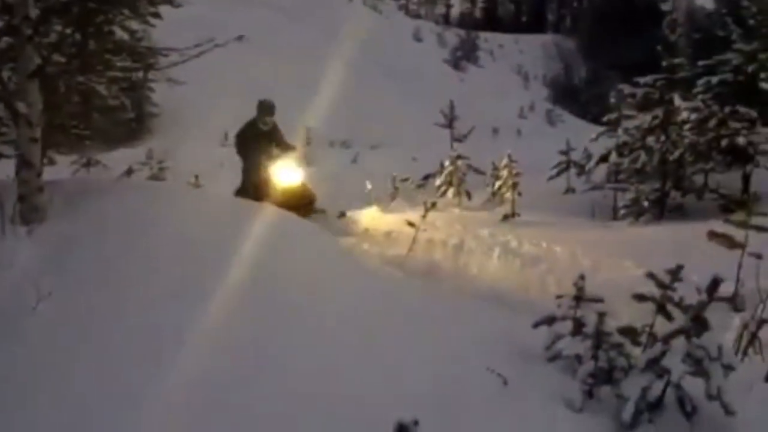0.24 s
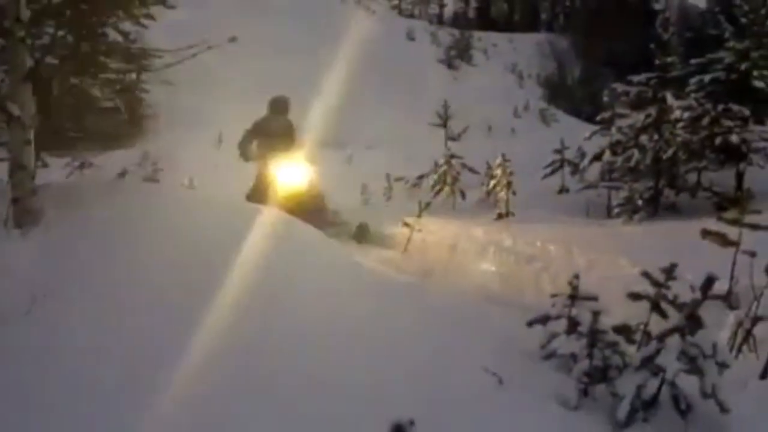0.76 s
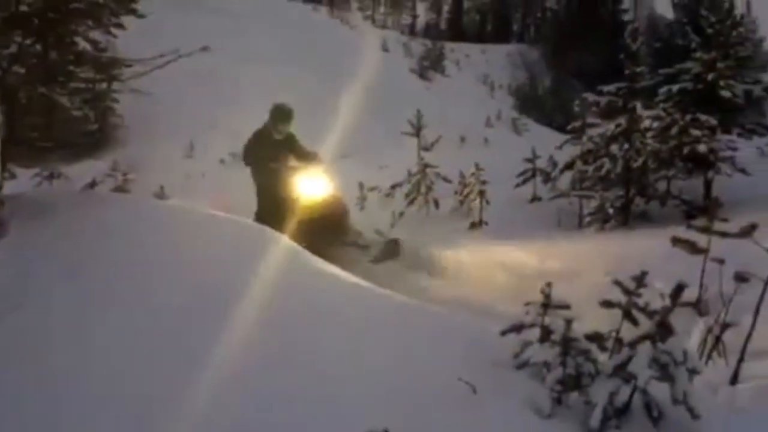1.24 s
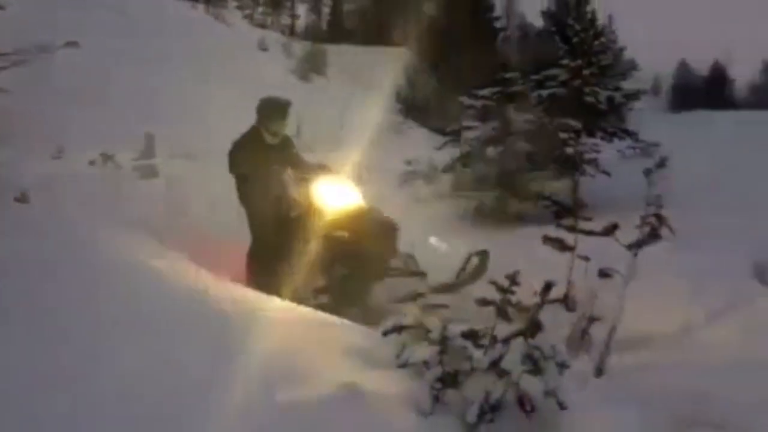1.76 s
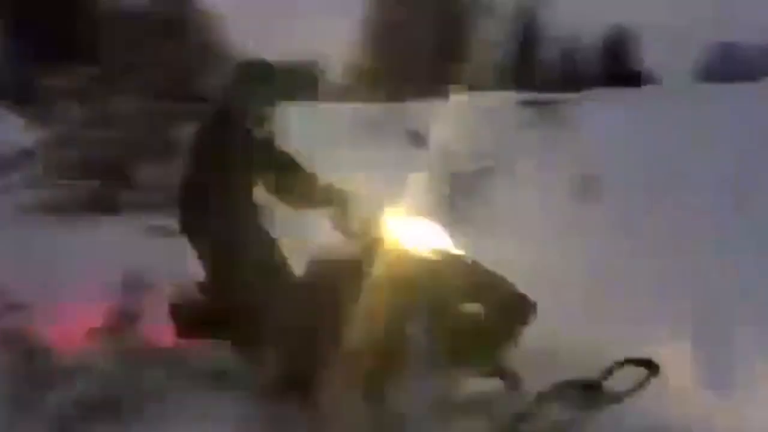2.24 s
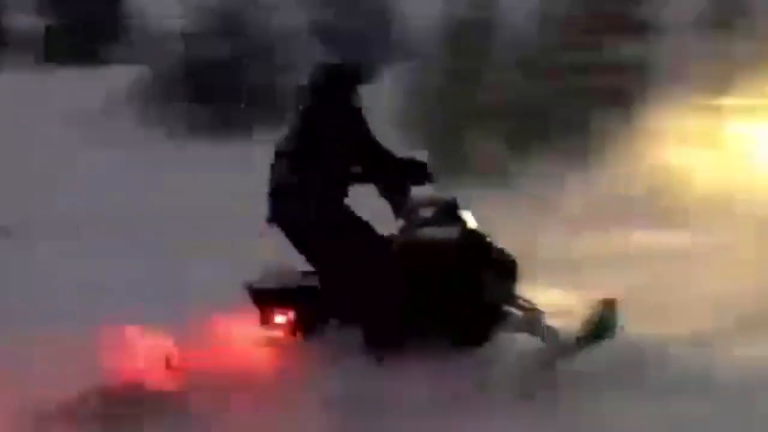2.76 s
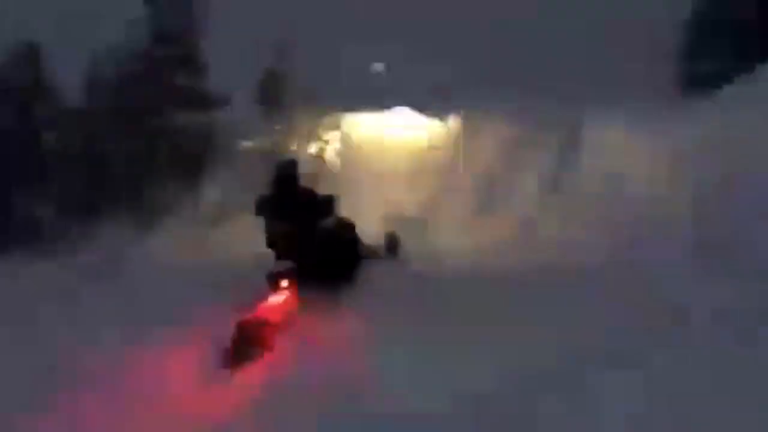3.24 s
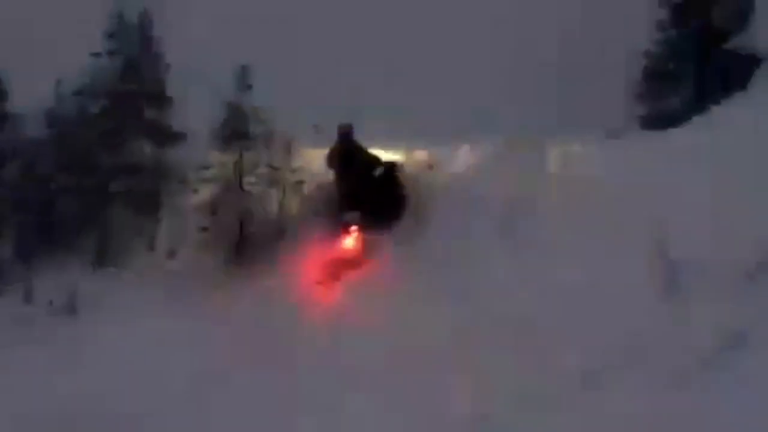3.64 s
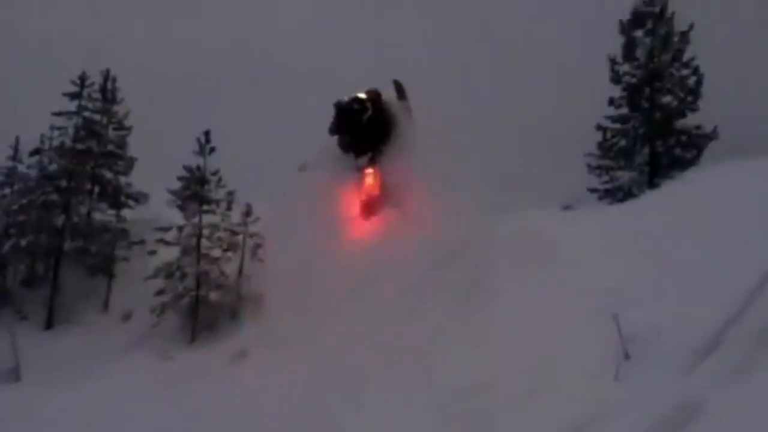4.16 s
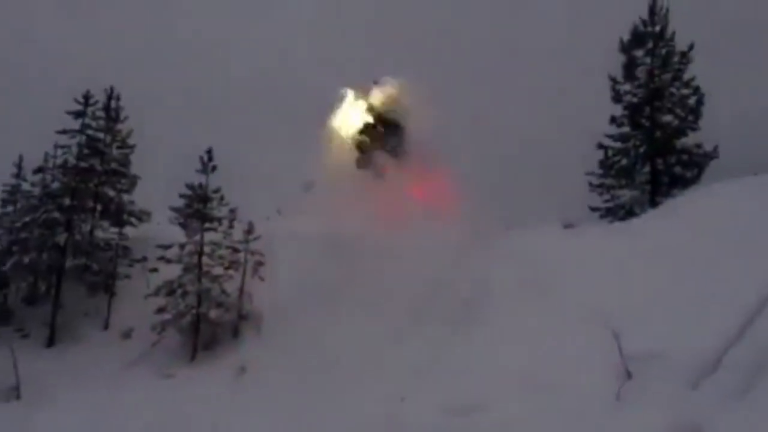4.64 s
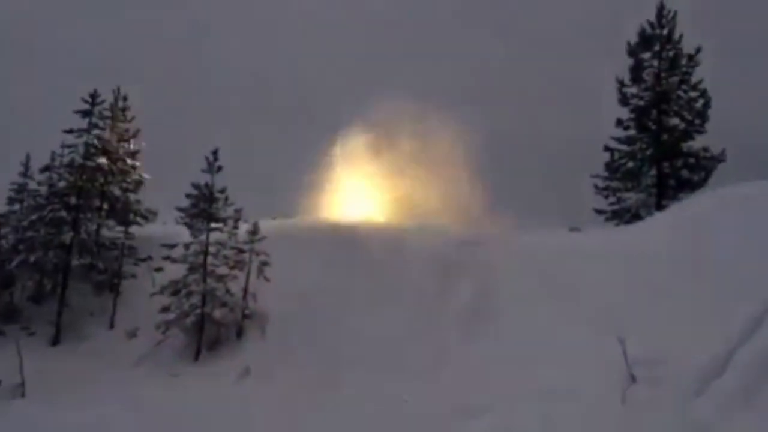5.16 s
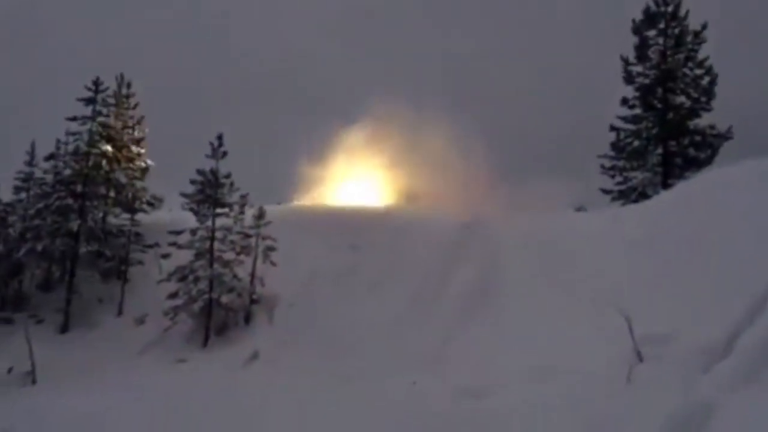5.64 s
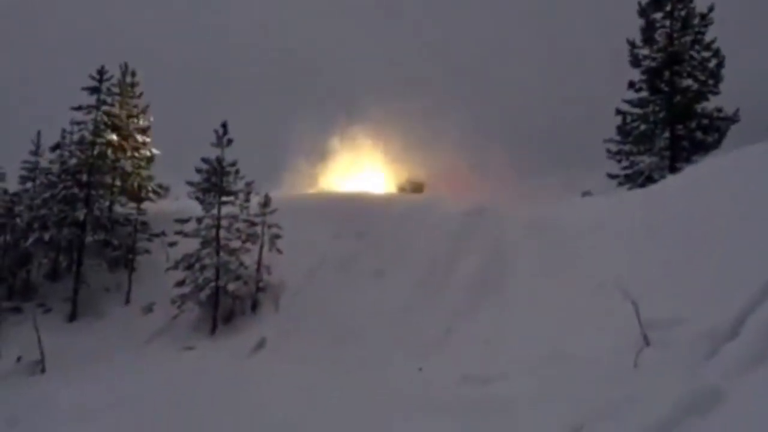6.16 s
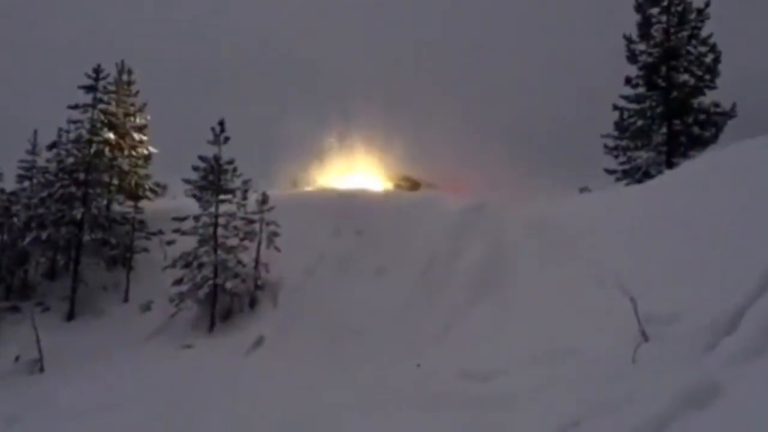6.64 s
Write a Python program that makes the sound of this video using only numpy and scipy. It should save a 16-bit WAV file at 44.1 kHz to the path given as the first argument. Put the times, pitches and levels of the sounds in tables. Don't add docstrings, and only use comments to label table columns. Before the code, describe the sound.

Raspy snowmobile engine swells from a low idle, rushes past with a windy thump, surges uphill, breaks into misfires and dies away.

```python
import sys
import numpy as np
from scipy import signal
from scipy.io import wavfile
from scipy.ndimage import uniform_filter1d

SR = 44100
rng = np.random.default_rng(int(sys.argv[2]) if len(sys.argv) > 2 else 0)


def bounce(signal):
    frames = np.transpose(np.atleast_2d(signal))
    limited = np.clip(frames, -1, 1)
    pcm = np.round(limited * 32767).astype(np.int16)
    wavfile.write(sys.argv[1], SR, pcm)


def voltage_ratio(decibels):
    exponent = np.asarray(decibels, float) / 20
    return 10 ** exponent


N = 304290
STEP = 40
CLOCK = np.arange(0, N + STEP, STEP) / SR
TOP_HZ = 8640
PASS_S, BANK_S, MISFIRE_S, COAST_S = 1.6, 3.2, 5.77, 6.32

# (time [s], rev change [Hz], bark change [dB], length [s])
GRIP = [
    (1.229, 10, 1, .1),
    (2.669, 15, -1, .135),
    (2.765, -7.5, 3.5, 0.055),
    (3.464, -23.5, -6, .116),
    (3.67, 4, -7, 0.0322),
    (5.374, -9, 3, .111),
    (5.428, 0.44, -7.5, .06),
]
# (time [s], bark [dB], brightness [dB])
THROTTLE = [(0, -47, 0.5), (.9, -42.5, -3.5), (1.19, -28.5, -2), (1.75, -26, 12), (2.12, -28.5, 4.5),
            (2.27, -35, -11), (2.55, -25, 1), (3.05, -25.5, -0.5), (3.22, -38.5, 8), (3.4, -37.5, -18.5),
            (4.15, -30, 5.5), (4.43, -37.5, -8), (4.75, -25.5, 0.5), (5.75, -26, 0.5), (5.84, -38.5, 4),
            (6.2, -31, -6.5), (6.25, -43, 0), (6.9, -45, -3.5)]


def engine():
    hz = revs()
    levels = orders(hz)
    uneven, hiss = burn()[:2]
    fits = voltage_ratio(4 * np.clip(drift(7), -2, 2))
    uneven = uneven * fits ** (1 - after(MISFIRE_S))
    hiss = np.minimum(hiss * fits ** .7, .8)
    turns = 2 * np.pi * np.cumsum(fine(hz)) / SR + fine(.03 * drift(20))
    cycle = np.floor(turns / (2 * np.pi) + 0.12).astype(int) + 2
    chance = rng.standard_normal(2400)[cycle]
    mismatch = .05 * (1 + 0.85 * nose_on())
    strength = 1 + fine(uneven) * chance + fine(mismatch) * (-1.) ** cycle
    strength = uniform_filter1d(strength, size=24)
    lift_db = catching()
    tones = bark(hz, turns, hiss) * strength + pipe(turns, strength, levels)
    breath = (1 + strength) / 2 * jet(turns, hiss)
    return fine(voltage_ratio(lift_db)) * tones + fine(voltage_ratio(0.45 * lift_db)) * breath


def revs():
    # (time [s], firing rate [Hz])
    speed = [(0, 187.3), (.23, 197.3), (.88, 199.7), (1.3, 266.2), (1.71, 287.1), (2.06, 280.7),
             (2.29, 221.9), (2.64, 245.7), (2.95, 264.3), (3.22, 230.9), (3.84, 243.8), (4.09, 274.7),
             (4.43, 231.5), (4.69, 261.7), (5.02, 283.4), (5.75, 281.9), (5.9, 249.4), (6.9, 191.5)]
    bend = sum(hz * swell(s, length) for s, hz, _, length in GRIP)
    return uniform_filter1d(in_time(speed)[0], size=60) + bend


def load():
    return in_time(THROTTLE)[0] + sum(db * swell(s, length) for s, _, db, length in GRIP)


def burn():
    idle_hz, clear_hz, lag_s = 195, 250, .02
    hz = revs()
    dirty = np.clip((clear_hz - np.interp(CLOCK - lag_s, CLOCK, hz)) / (clear_hz - idle_hz), 0, 1)
    shutting = np.clip(-np.gradient(hz, CLOCK) / 250, 0, 1) ** 2
    misfire, coast, nose = after(MISFIRE_S), after(COAST_S), nose_on()
    uneven = np.maximum(.062 + .13 * dirty + .04 * nose + .12 * shutting, .14 * misfire)
    hiss = .02 + .4 * dirty ** 1.3 + .1 * nose + .18 * shutting
    hiss = hiss * (1 - misfire) + .1 * misfire + .55 * coast
    rasp_db = 1.2 * dirty + nose * (3.8 + 3.5 * dirty)
    rasp_db = rasp_db * (1 - misfire) - 5.4 * misfire + 10.0 * coast
    boom_db = 9.3 * misfire - 5.5 * coast
    return uneven, hiss, rasp_db, boom_db


def catching():
    # (time [s], lift [dB], length [s])
    catches = [(3.307, -11.5, 0.026), (5.773, 8.5, 0.015), (5.799, 12.5, 0.014), (5.832, 13.5, 0.015),
               (5.87, 14.5, 0.019), (5.906, 10, 0.028), (5.953, -1, .012), (5.964, 8, 0.019),
               (5.994, 13, 0.04), (6.037, 11.5, .014), (6.053, 5.5, .016), (6.104, 4, 0.0086),
               (6.131, 11, 0.022), (6.162, 15, 0.02), (6.195, 10.5, 0.026), (6.279, 11.5, 0.0093)]
    lift = sum(db * np.exp(-((CLOCK - s - length / 2) / (length * .5)) ** 6) for s, db, length in catches)
    return lift - 19.1 * uniform_filter1d(lift > 1, size=100, output=float)


def pipe(turns, strength, levels):
    # (order [-], level against the bark [dB])
    shaft = [(.5, -29.5), (1.5, -40.5), (2.5, -21), (3.5, -30.5), (4.5, -21.5)]
    soft = 1 + 0.68 * (uniform_filter1d(strength, size=200) - 1)
    whole = sum(fine(voltage_ratio(db)) * np.cos((k + 1) * (turns - .5 * k)) for k, db in enumerate(levels))
    load_db = uniform_filter1d(load(), size=200)
    half = 0
    for k, db in shaft:
        gain = voltage_ratio(load_db + db + 6.1 * drift(3.3))
        half = half + fine(gain) * np.cos(k * turns + fine(drift(1.4)))
    return np.sqrt(2) * soft * (whole + half)


def orders(hz):
    # (time [s], level [dB])
    note = [(0, -30.5), (.23, -26.5), (.8, -25.5), (1.15, -20.5), (1.4, -22.5), (1.72, -30), (2.0, -21.5),
            (2.29, -29.5), (2.4, -21.5), (2.63, -24.5), (2.8, -39.5), (3.25, -32), (3.6, -37), (4.2, -25.5),
            (5.0, -30), (5.8, -38), (6.17, -30), (6.9, -50.5)]
    # (order [-], level against the bark [dB], share of the note's swing [-])
    overtones = [(2, -8.5, 0.41), (3, -4.5, .2), (4, -1.5, 0.017)]
    note_db, = in_time(note)
    levels = [note_db]
    for k, db, share in overtones:
        swing_db = share * (note_db - load())
        levels.append(load() + db + swing_db + echo_db(k * hz) + 2.2 * drift(6))
    return levels


def bark(hz, turns, hiss):
    puffs, open_ground = 0, 1 - burn()[3] / 12
    for k in range(5, 38):
        flutter_db = min(.27 * k, 4.2) * drift(19)
        fade_db = 3.0 * open_ground * drift(3) + flutter_db
        gain = voltage_ratio(bark_db(k * hz) + fade_db) * np.sqrt(2 - 2 * hiss)
        shift = .25 * open_ground * drift(1.5) + .0012 * k * k * drift(25)
        spread = 0.0401 * k * k * open_ground
        puffs = puffs + fine(gain) * np.cos(k * (turns - .5) - fine(spread - shift))
    return puffs


def bark_db(hz, echo=1):
    regions_db = [-2.5, -6, -20.5, -29.5]
    brightens = [0, .2, 0.698, 1.1]
    # (frequency [Hz], level [dB])
    hood = [(1000, -1), (1250, 0), (1500, -2), (1850, 1), (2250, 0), (2700, 1), (3050, -3), (3900, 0),
            (4600, -2), (5200, -2), (7000, 0), (8000, -1), (8600, -4)]
    rasp_hz, boom_hz = 1878, 1180
    bright_db = in_time(THROTTLE)[1]
    place = np.interp(np.log(hz), np.log([1450, 2250, 3750, 6400]), [0, 1, 2, 3])
    tilt = 0
    for k in range(4):
        near = np.clip(1 - np.abs(place - k), 0, 1)
        tilt = tilt + (regions_db[k] + brightens[k] * bright_db) * near
    rasp_db, boom_db = burn()[2:]
    rings = rasp_db * np.exp(-((hz - rasp_hz) / 200.) ** 2)
    rings = rings + boom_db * np.exp(-((hz - boom_hz) / 250.) ** 2)
    rings = rings + boom_db * np.exp(-((hz - 2.25 * boom_hz) / 220.) ** 2)
    hood_hz, hood_db = np.transpose(hood)
    colour = np.interp(np.log(hz), np.log(hood_hz), hood_db)
    return load() + tilt + rings + echo * echo_db(hz) + colour


def echo_db(hz):
    # (time [s], frequency [Hz], lift [dB], length [s])
    echoes = [(1.345, 810, 9.5, 0.13), (1.285, 1090, -10, 0.053), (1.475, 1950, 8.5, .1),
              (1.72, 565, 11, 0.14), (1.843, 2900, 5, 0.023), (1.987, 1130, 10.5, 0.12),
              (2.051, 565, -14, .05), (2.599, 1150, 14, 0.049), (2.829, 1200, 3.5, 0.18),
              (2.983, 2300, 13, 0.12), (2.994, 1450, -8, .06), (3.936, 2250, 13.5, 0.035),
              (4.143, 810, -11, 0.11), (4.25, 1020, 4.5, 0.096), (4.94, 1120, 9, .1),
              (5.145, 2200, 4, 0.15), (5.147, 560, 9, 0.22), (5.2, 840, -14, .12), (5.453, 830, -17, 0.081),
              (1.057, 4150, -28, 0.082), (1.4, 3400, 8, 0.24), (2.172, 3780, 15.5, 0.14),
              (2.668, 2960, 15, .12), (2.884, 4000, 10.5, 0.39), (3.764, 1490, -8, 0.2),
              (4.19, 2310, 8.5, 0.1), (4.901, 1417, -7, 0.14), (5.618, 850.5, -11, .1),
              (4.47, 970, 8.5, 0.21), (1.25, 1660, 1.5, 0.052)]
    width = 0.15
    return sum(db * swell(s, length) * np.exp(-(np.log(hz / at_hz) / width) ** 2)
               for s, at_hz, db, length in echoes)


def jet(turns, hiss):
    white = rng.standard_normal((2, N)) * (0.95 + 0.05 * (1 + np.cos(turns - .8)) ** 2)
    out, edges = 0, np.concatenate([np.arange(950, 3200, 250), np.arange(3200, 8800, 500)])
    per_band = np.sqrt(hiss * SR / 500)
    for k, (low, high) in enumerate(zip(edges, edges[1:])):
        outlast_db = 2.2 * low / 1000
        level_db = bark_db((low + high) / 2, echo=.4) + 2.0 * drift(11) + outlast_db
        out = out + fine(per_band * voltage_ratio(level_db)) * band(white[k % 2], low, high)
    return out


def nose_on():
    return np.clip(PASS_S - CLOCK, 0, .5) * 2


def track():
    # (time [s], lug rate [Hz], level [dB])
    lugs = [(1.05, 90, -90), (1.18, 110, -39), (1.35, 160, -33.5), (1.55, 210, -38.5), (2.05, 255, -57),
            (2.2, 240, -73), (3.0, 225, -44), (3.2, 190, -43), (3.45, 165, -56), (3.8, 172, -42),
            (4.0, 195, -34.5), (4.2, 225, -34.5), (4.4, 262, -45), (4.6, 300, -21), (4.68, 310, -57),
            (4.8, 225, -78), (5.0, 220, -30), (5.4, 220, -51)]
    hz, db = in_time(lugs)
    turns = 2 * np.pi * np.cumsum(fine(hz)) / SR + fine(.5 * drift(36))
    return np.sqrt(2) * fine(voltage_ratio(db + 2.0 * drift(17))) * np.cos(turns)


def churned_snow():
    # (time [s], lift [dB], length [s])
    churn = [
        (0.499, -1, 0.1),
        (1.05, -4.5, 0.19),
        (2.29, -4.5, 0.13),
        (3.75, -5.5, 0.43),
        (4.49, 6.5, 0.38),
        (5.705, -11.5, 0.12),
        (6.403, 5.5, 1),
    ]
    # (frequency [Hz], density [dB per Hz])
    spectrum = [(120, -34), (200, 9.5), (350, -0.5), (700, 1), (1100, -4), (1600, -1), (2400, -26)]
    lift_db = sum(db * swell(s, length) for s, db, length in churn)
    level_db = -40 + lift_db + 0.14 * breeze_db() + 1.5 * drift(3)
    return fine(voltage_ratio(level_db)) * coloured(spectrum, patchy_db=4.0)


def gust():
    # (time [s], level [dB])
    wake = [
        (2.6, -77),
        (2.655, -31),
        (2.68, -22.5),
        (2.75, -28),
        (2.9, -25),
        (3.02, -33.5),
        (3.06, -61),
        (3.1, -58),
    ]
    # (frequency [Hz], density [dB per Hz])
    spectrum = [(30, -4.5), (60, 0), (120, 4), (200, -8), (400, -5), (600, -25.5)]
    return fine(voltage_ratio(in_time(wake)[0] + 2.0 * drift(24))) * coloured(spectrum, patchy_db=-1.5)


def rumble():
    # (frequency [Hz], density [dB per Hz])
    spectrum = [(20, -23), (40, -0.5), (80, 7.5), (140, 4), (220, -11), (300, -33.5)]
    return fine(voltage_ratio(-52.5 + breeze_db() + 0.94 * drift(4.9))) * coloured(spectrum, patchy_db=3.5)


def breeze_db():
    # (time [s], lift [dB], length [s])
    puffs = [
        (.1, 15, .2),
        (0.603, 10.5, 0.26),
        (1.274, 7, 0.076),
        (1.748, 7.5, 0.56),
        (2.5, 7, 0.24),
        (3.44, -5, 0.19),
        (4.052, 11, 0.23),
        (4.828, 8.5, .1),
        (6.195, 14.5, .25),
        (6.702, 11, .25),
    ]
    return sum(db * swell(s, length) for s, db, length in puffs)


def coloured(spectrum, patchy_db):
    out, white, (hz, db) = 0, rng.standard_normal((2, N)), np.transpose(spectrum)
    edges = hz[0] * 2 ** np.arange(0, np.log2(hz[-1] / hz[0]), 1 / 3)
    for k, (low, high) in enumerate(zip(edges, edges[1:])):
        level = np.interp(np.log(low * high) / 2, np.log(hz), db)
        out = out + fine(voltage_ratio(level + patchy_db * drift(24))) * band(white[k % 2], low, high)
    return rms_one(out)


def band(x, low, high):
    return signal.sosfilt(signal.butter(2, [low, high], "band", fs=SR, output="sos"), x)


def rms_one(x):
    return x / np.sqrt(np.mean(x ** 2) + 1e-20)


def drift(rate):
    r = np.exp(-2 * np.pi * STEP * rate / SR)
    settle = 2000
    white = rng.standard_normal(len(CLOCK) + settle)
    return rms_one(signal.lfilter([1], [1, -2 * r, r * r], white)[settle:])


def in_time(rows):
    s, *columns = np.transpose(rows)
    return [np.interp(CLOCK, s, c) for c in columns]


def swell(s, length):
    return np.exp(-((CLOCK - s) / length) ** 2)


def after(s):
    return uniform_filter1d(CLOCK > s, size=60, output=float)


def fine(slow):
    return np.interp(np.arange(N) / STEP, np.arange(len(slow)), slow)


def scene():
    # (frequency [Hz], width [Hz], depth [0-1])
    dips = [(3030, 130, .7), (4930, 560, .85)]
    sled = engine() + track() + churned_snow() + gust() + rumble()
    sled = sled + (fine(voltage_ratio(2.0 * drift(9))) - 1) * band(sled, 3000, 9500)
    cancelled = 0
    for hz, width, depth in dips:
        cancelled = cancelled + depth * signal.lfilter(*signal.iirpeak(hz, hz / width, SR), sled)
    return (sled - fine(.3 + .7 * after(BANK_S)) * cancelled)[None]


def thinned(x, under_db, from_hz):
    hz, _, frames = signal.stft(x, SR, nperseg=1536)
    treble = (hz > from_hz) & (hz < TOP_HZ)
    power = np.abs(frames[treble]) ** 2
    near = uniform_filter1d(power, size=3, axis=0)
    around = uniform_filter1d(power, size=36, axis=0)
    frames[treble] *= np.where(near < around * voltage_ratio(-2 * under_db), .05, 1)
    return signal.istft(frames, SR, nperseg=1536)[1][:N]


def top_cut(x):
    return signal.sosfilt(signal.butter(12, 8370, fs=SR, output="sos"), x)


def record(dry):
    rounded = .9 * np.tanh(dry[0] / .9)
    thin = thinned(rounded, under_db=4.9, from_hz=2700)
    cut = signal.sosfilt(signal.cheby2(12, 60, TOP_HZ, fs=SR, output="sos"), thin)
    return top_cut(cut[None])


dry = scene()
out = record(dry)
bounce(out)
```